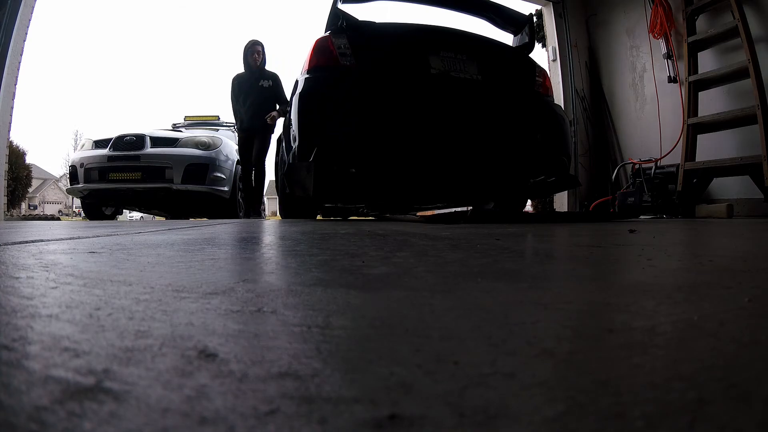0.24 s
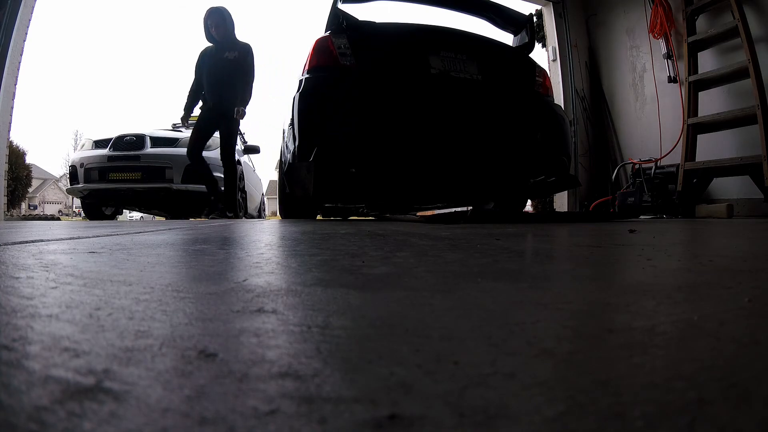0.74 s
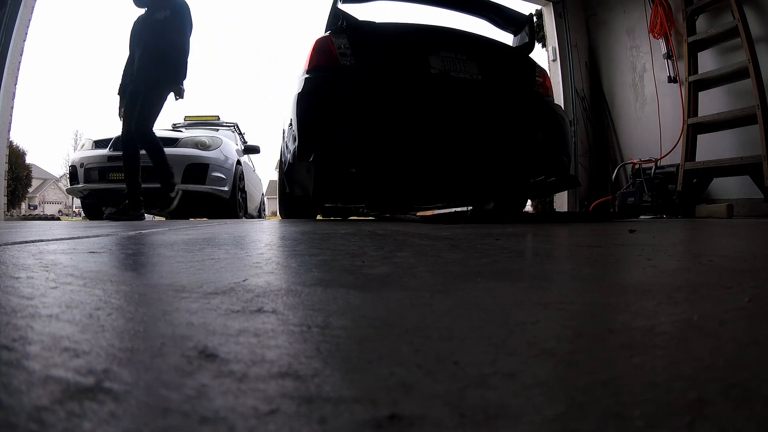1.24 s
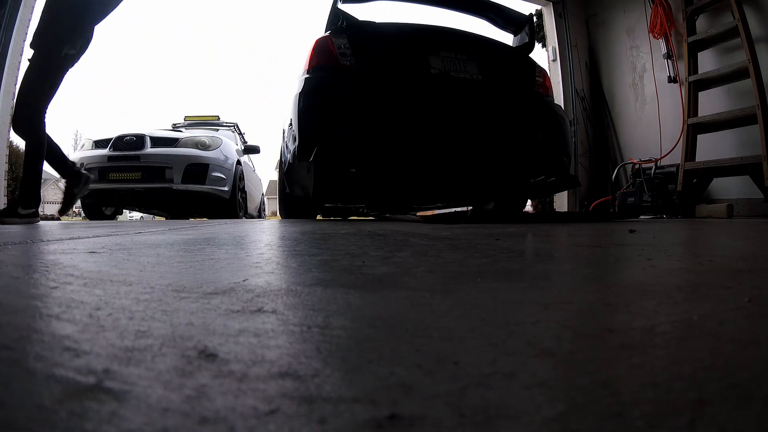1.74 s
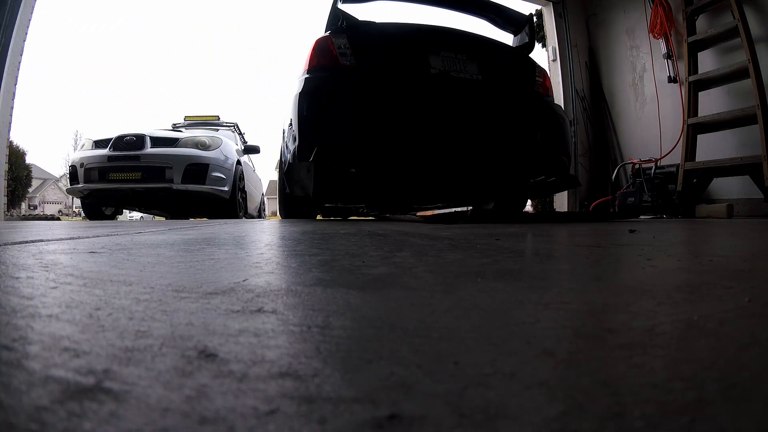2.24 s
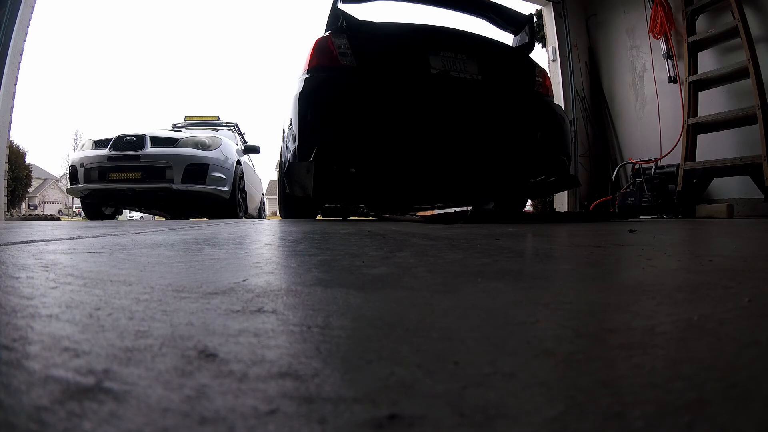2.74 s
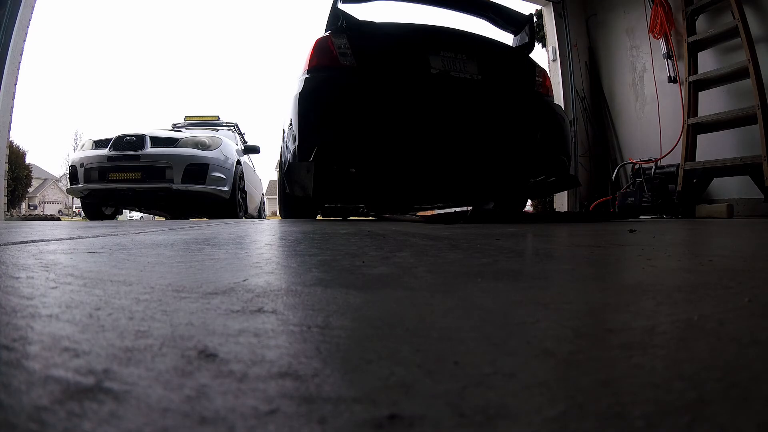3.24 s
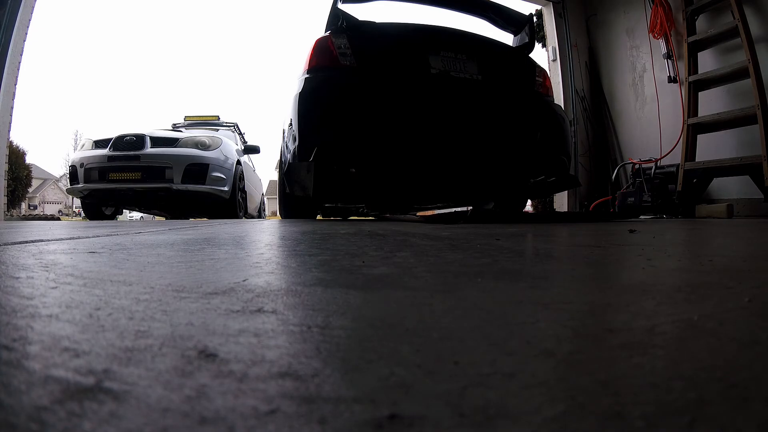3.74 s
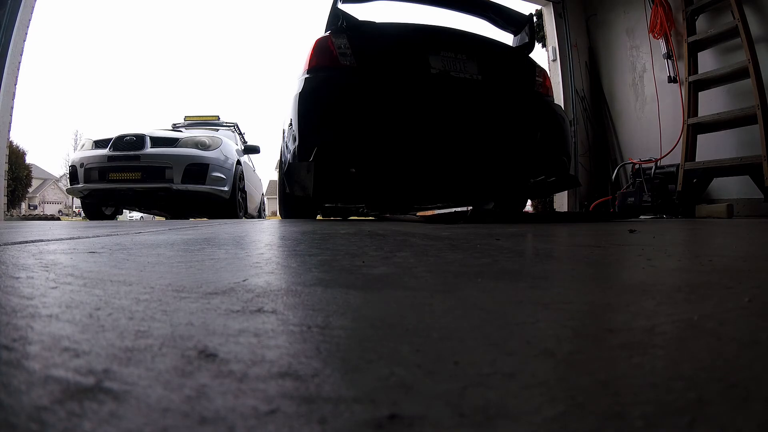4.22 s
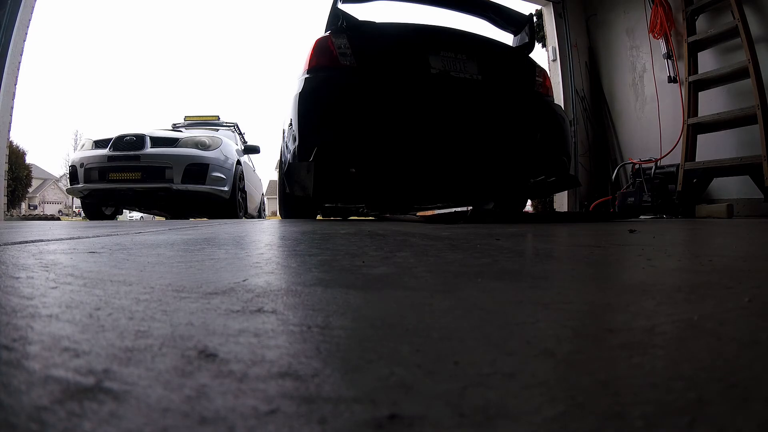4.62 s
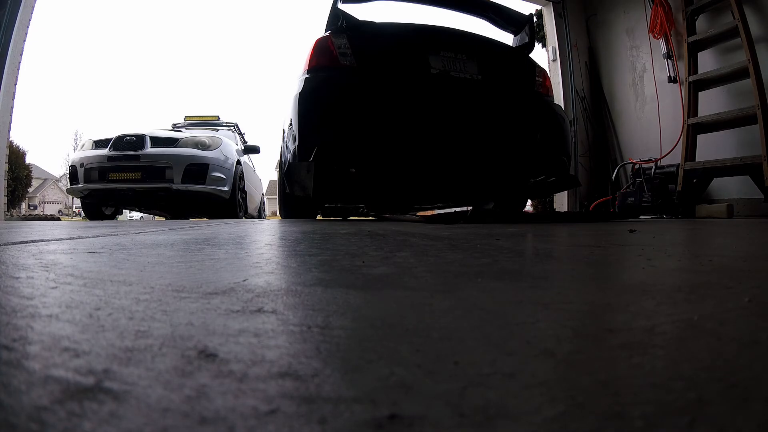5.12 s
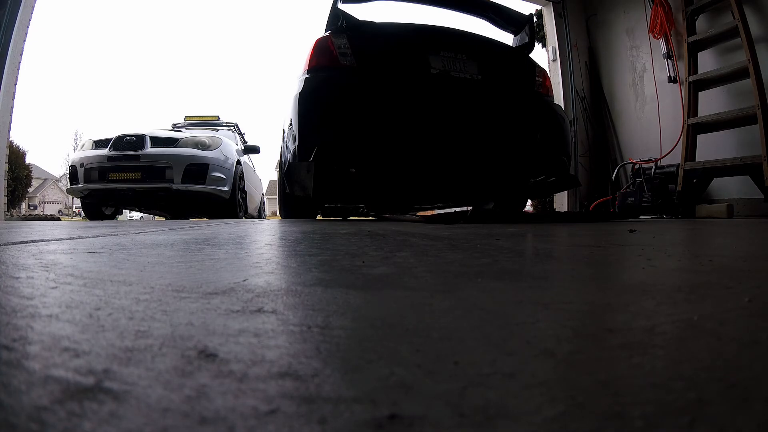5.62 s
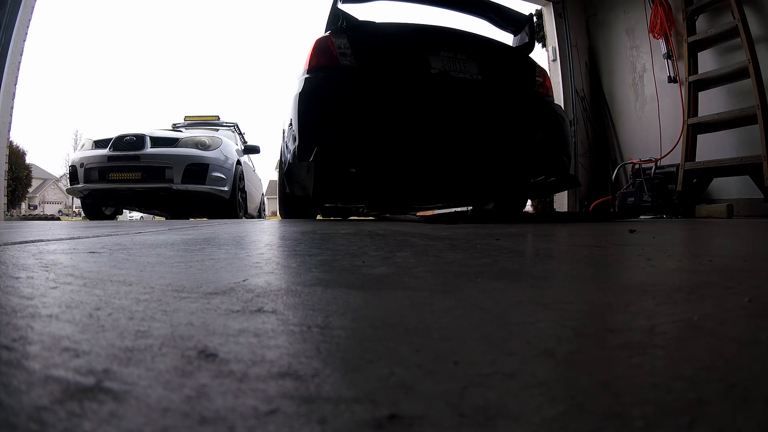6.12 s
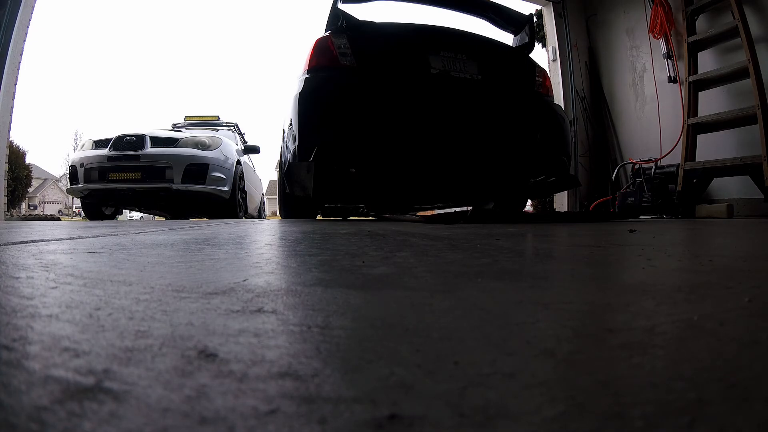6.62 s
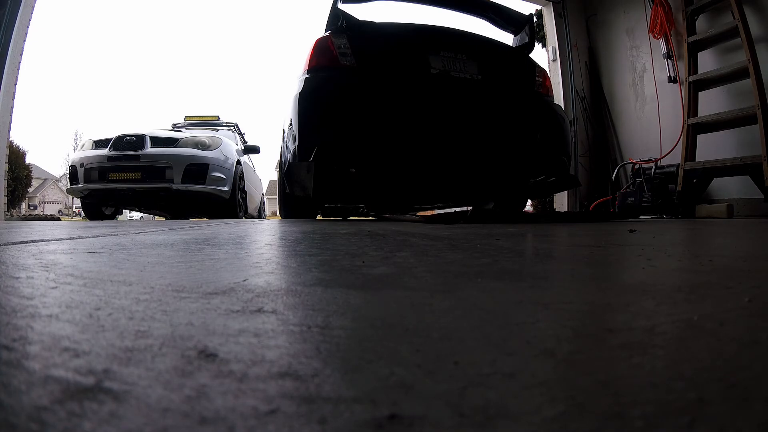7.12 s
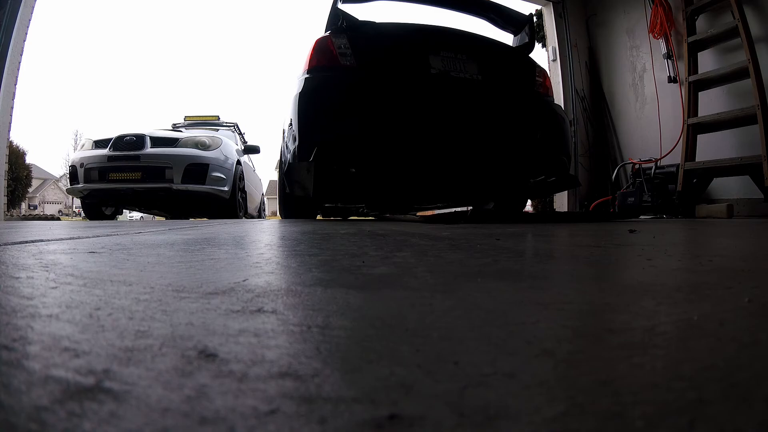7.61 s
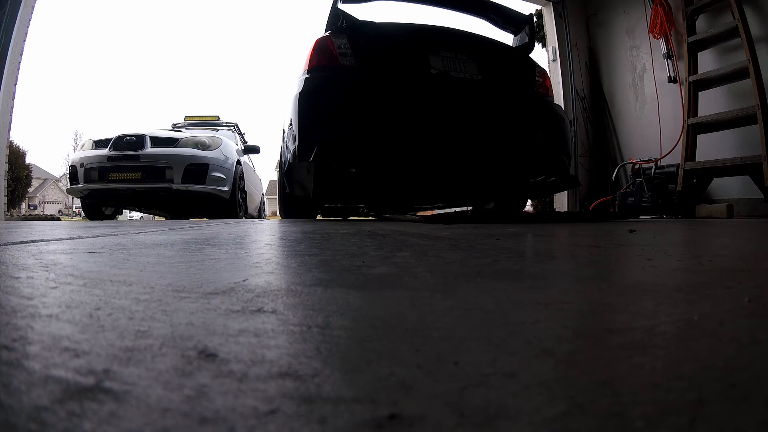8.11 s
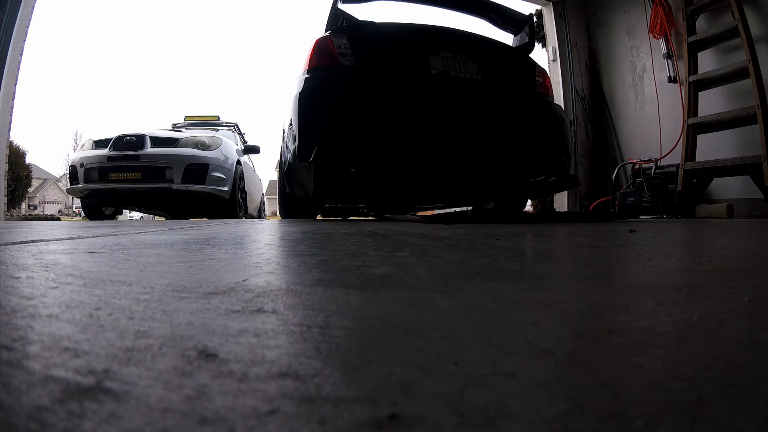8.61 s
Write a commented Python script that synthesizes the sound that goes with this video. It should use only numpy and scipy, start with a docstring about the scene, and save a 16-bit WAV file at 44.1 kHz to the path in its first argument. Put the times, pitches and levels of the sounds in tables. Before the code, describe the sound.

A turbocharged four-cylinder car idles fast and very loud through an open straight exhaust in a garage. The low boom starts slightly lumpy, smooths for about a second, then flares into a barking, uneven lope and settles, creeping up slightly in speed. Raspy gas puffs and faint valve ticking ride along. A small microphone on the floor near the tailpipe hears it close and slightly saturated.

```python
"""A booming, throbbing fast idle: a turbocharged four-cylinder car with an open straight pipe, tail in a garage.
The idle starts half lumpy, runs smooth for a second, flares into a lumpier lope and creeps up in speed.
Unequal pulses, summed as multiples of the engine cycle, make pipe and garage boom once per cycle.
Noise bursts at every firing give lumps and rasping gas; clicks ring the ticking valve gear.
A sine locked to the crank is the faint whine of a belt-driven accessory. A small microphone is on the floor."""
import sys
import numpy as np
from scipy import signal
from scipy.fft import rfft, irfft, next_fast_len
from scipy.io import wavfile

SR = 44100
rng = np.random.default_rng(int(sys.argv[2]) if len(sys.argv) > 2 else 0)


def bounce(signal):
    """Save signal as a 16-bit WAV file at the path given by the first command-line argument."""
    frames = np.transpose(np.atleast_2d(signal))
    limited = np.clip(frames, -1, 1)
    pcm = np.round(limited * 32767).astype(np.int16)
    wavfile.write(sys.argv[1], SR, pcm)


N = 390726
TIME = np.arange(N) / SR

# Crank speed: (time [s], speed [rpm])
CRANK_SPEED = [(0.0, 1517.5), (0.24, 1544.6), (1.05, 1544.6), (1.47, 1555.0), (4.2, 1581.3), (6.55, 1588.3),
               (7.78, 1607.6), (8.86, 1604.7)]
# Exhaust pulse of each cylinder: (place in the two-turn cycle [0-1], level [dB])
CYLINDERS = [(0.053, -2.0), (0.316, -5.1), (0.554, -3.1), (0.817, -6.5)]
# Resonances of pipe and garage, which delay the sound near their pitch: (frequency [Hz], width [Hz])
RESONANCES = [(55.3, 13.5), (108.0, 8.4), (131.8, 9.5), (250.3, 8.0), (313.9, 16.9), (439.3, 35.3),
              (570.8, 31.6), (675, 30), (770, 25), (870, 25), (1025, 30), (1120, 25)]
# What goes with each firing, relative: (gas puff level [dB], valve tick level [dB])
STROKES = [(-2, 2.5), (-1, -1), (-2, -5), (-1.5, 2.5)]
# Colour of the uneven thumps and their echoes: (frequency [Hz], relative level [dB])
LUMP_COLOUR = [(22, -17), (50, -16), (100, -7), (160, -1), (220, -13), (265, -6), (310, -3), (385, -11),
               (435, -2), (560, -11), (700, -18), (1000, -32)]
# Colour of the rasping gas: (frequency [Hz], relative level [dB])
RASP_COLOUR = [(450, -12.5), (690, 6), (820, -9), (865, 4.5), (920, -3.5), (1120, 1.5), (1190, -6),
               (1300, -1), (1520, -2), (1750, -11), (2000, -15), (2400, -22.5), (3200, -34.5), (4500, -39),
               (8000, -50)]
# Colour of the valve gear: (frequency [Hz], relative level [dB])
VALVE_COLOUR = [(2000, -3), (3000, -5.5), (4000, -8), (4500, -5.5), (4750, -1), (5100, -1), (6200, -3),
                (6800, -13), (8300, -17), (10000, -20), (11500, -26.5)]
# Ring of the valve gear before colouring: (frequency [Hz], relative level [dB], t60 [s])
TAPPET_MODES = [(4720, 0, .022), (4840, -3, .016), (6100, -10, .008)]
# Where the bark sits in the exhaust: (frequency [Hz], share of the bark's dB [about 0-1])
BARK_SHARE = [(52, 0.8), (66, 0), (530, 0.03), (573, 1.04), (620, 0.06), (720, .4), (765, 1), (830, 0.01),
              (1000, 0.7), (1150, 0.4)]
# How each sound follows the engine, before fixed trims: (smooth idle [dB], added when settled [dB],
# added in the flare [dB], change as the engine warms [dB/s])
BARK_LAW = (-2, -0.5, 7.5, -0.3)
RASP_LAW = (-44, 2.5, 0.4, .22)
VALVE_LAW = (-59.5, 2.5, 0.4, -0.2265)
# Lean of the drone from the eleventh multiple towards the twelfth, same columns; it grows as the pipe warms
LEAN_LAW = (0, -1.6, 0.33, 0.44)
# Boom of pipe and garage, before bark, lean, swell and wander:
# (multiple of the cycle rate, smooth idle [dB], settled idle [dB])
BOOM = [(3, -38, -40), (4, -29, -39.5), (5, -35.5, -29), (6, -46.5, -41), (7, -29, -29.5), (8, -21, -20),
        (9, -25.5, -27.5), (10, -42.5, -39.5), (11, -15.5, -17.5), (12, -16.5, -14), (13, -28, -34),
        (14, -47, -37.5)]
# Growl above the boom, before lope, resonances and standing waves: (frequency [Hz], level of each multiple [dB])
GROWL = [(200, -32), (265, -28.5), (320, -35), (420, -33), (480, -34), (570, -43), (640, -55), (715, -51),
         (820, -61.5), (1130, -63.5)]
# Unequal firings shape every four multiples alike, counted from a multiple of the firing rate,
# fading with frequency: (smooth idle [dB], settled idle [dB])
LOPE = [(5.5, -1.5), (-5.5, -7.5), (-13, -12), (1, 1)]
# Multiples that standing waves lift or cancel: (multiple, added in smooth idle [dB], added in settled idle [dB])
STANDING_WAVES = [(21, -15, -6), (22, -4, -5), (23, -5.5, 4), (24, 4, -5), (25, -8, 15), (30, 12, -9.5),
                  (33, 11, 1.1), (41, 8.5, -8)]
# Hollow-tone swells, at the start and as the flare dies away: (start [s], length [s])
SWELLS = [(-.15, .62), (2.45, 0.93)]

# The idle starts partly lumpy (share 0-1), turns smooth, then settles into its lope
FIRST_LUMPY, SMOOTH_AT_S, SETTLE_AT_S, CHANGE_S = 0.57, 0.3, 1.35, 0.15
FLARE_HOLD_S, FLARE_RELEASE_S = 0.83, 0.4
TOP_MULTIPLE = 86
LOPE_FADES_HZ = 450
# Above this frequency the resonances lift the multiples near them
RING_FROM_HZ, RING_DB = 550, 7.5
SWELL_HZ, SWELL_WIDTH_HZ, SWELL_DB = 458.5, 8.3, 8
CUTOFF_HZ = 11200


def from_db(db):
    """Decibels to gain."""
    return 10 ** (np.asarray(db) / 20)


def rms_one(x):
    """Scale to unit rms."""
    return x / np.sqrt(np.mean(x ** 2) + 1e-20)


def in_time(rows):
    """Each column of a curve at every sample."""
    seconds, *columns = np.transpose(rows)
    return [np.interp(TIME, seconds, column) for column in columns]


def drift(rate, t):
    """Random wander: straight lines between normal draws of spread 1, rate of them a second."""
    knots = rng.standard_normal(512)
    return np.interp(t * rate, np.arange(len(knots)), knots)


def ramp(start_s, length_s):
    """A straight rise from 0 to 1."""
    return np.clip((TIME - start_s) / length_s, 0, 1)


def coloured(x, spectrum):
    """Pass x through a causal (minimum-phase) filter of the given colour with steep ends; rms 1."""
    size = next_fast_len(N + SR // 2, True) // 2 * 2
    hz, db = np.transpose(spectrum)
    octave = np.log2(np.maximum(np.arange(size // 2 + 1) * SR / size, 1))
    below = np.maximum(np.log2(hz[0]) - octave, 0)
    above = np.maximum(octave - np.log2(hz[-1]), 0)
    # 24 dB per octave outside the table, for three octaves
    gain_db = np.interp(octave, np.log2(hz), db) - 24 * np.minimum(below + above, 3)
    # folding the cepstrum onto positive times makes the filter minimum-phase
    cepstrum = irfft(np.log(from_db(gain_db)))[:size // 2]
    cepstrum[1:] *= 2
    response = np.exp(rfft(cepstrum, size))
    return rms_one(irfft(rfft(x, size) * response)[:N])


def firings(cycles, lag):
    """Sample and cylinder of every firing, taken lag cycles after its pulse."""
    whole_cycles = np.arange(int(cycles[-1]) + 1)[:, None]
    places = (whole_cycles + np.array(CYLINDERS)[:, 0] + lag).ravel()
    at = np.searchsorted(cycles, places[places < cycles[-1]])
    return at, np.arange(len(at)) % len(CYLINDERS)


def clicks(at, heights):
    """Single clicks at the given samples."""
    out = np.zeros(N)
    out[at] = heights
    return out


def bursts(at, db, rise_s, decay_s):
    """An envelope that rises quickly at each click and dies away; rms 1."""
    out = clicks(at, from_db(db)) + 1e-18
    for seconds in (rise_s, decay_s):
        out = signal.lfilter([1], [1, -np.exp(-1 / (seconds * SR))], out)
    return rms_one(out)


def ring(x, hz, t60):
    """A two-pole resonator: a unit click sets a decaying sine of about height 1 ringing."""
    radius = from_db(-60 / (t60 * SR))
    angle = 2 * np.pi * hz / SR
    return signal.lfilter([0, np.sin(angle)], [1, -2 * radius * np.cos(angle), radius ** 2], x + 1e-18)


def idle_state():
    """How settled (lumpy) the idle is and how much it flares, each 0-1."""
    lope = ramp(SETTLE_AT_S, CHANGE_S)
    settled = FIRST_LUMPY * (1 - ramp(SMOOTH_AT_S, CHANGE_S)) + lope
    flare = lope * (1 - ramp(SETTLE_AT_S + CHANGE_S + FLARE_HOLD_S, FLARE_RELEASE_S))
    return settled, flare


def follow(law, settled, flare):
    """Level in dB of a sound that follows the state and warmth of the engine."""
    smooth_db, settled_db, flare_db, db_per_s = law
    return smooth_db + settled_db * settled + flare_db * flare + db_per_s * TIME


def swelling():
    """Strength 0-1 of the hollow tone, a smooth arch for each swell."""
    return sum(np.sin(np.pi * ramp(start_s, length_s)) for start_s, length_s in SWELLS)


def multiples(cycle_hz):
    """Rows (multiple, smooth dB, settled dB): the boom, then growl shaped by lope, resonances, standing waves."""
    rows = [(round(order), *db) for order, *db in BOOM]
    standing = {round(order): np.array(db) for order, *db in STANDING_WAVES}
    growl_hz, growl_db = np.transpose(GROWL)
    centre, width = np.transpose(RESONANCES)
    for order in range(len(BOOM) + rows[0][0], TOP_MULTIPLE + 1):
        hz = order * cycle_hz
        base_db = np.interp(np.log(hz), np.log(growl_hz), growl_db)
        lope_db = np.array(LOPE[order % len(LOPE)]) * min(1, (LOPE_FADES_HZ / hz) ** 2)
        nearness = (centre > RING_FROM_HZ) / (1 + (2 * (hz - centre) / width) ** 2)
        db = base_db + RING_DB * np.max(nearness) + lope_db + standing.get(order, 0)
        rows.append((order, *db))
    return rows


def exhaust_note(cycles, cycle_hz, settled, bark_db, lean_db):
    """The repeating part of the exhaust: four pulses a cycle, smeared by the resonances."""
    step = 9  # built at a ninth of the sample rate
    drone = {11: -1, 12: 1}
    wander_db, wander_rad, wander_rate = 0.9, 0.11, 1.4  # rate per second; scaled by looseness
    controls = (TIME, cycles, np.clip(settled, 0, 1), bark_db, lean_db, swelling())
    t, turn, mix, bark, lean, swell = (control[::step] for control in controls)
    place, pulse_db = np.transpose(CYLINDERS)
    centre, width = np.transpose(RESONANCES)
    out = 0
    for order, smooth_db, settled_db in multiples(cycle_hz):
        hz = order * cycle_hz
        pulses = np.sum(from_db(pulse_db) * np.exp(-2j * np.pi * order * place))
        delay = 2 * np.sum(np.arctan2(hz * width, centre ** 2 - hz ** 2))  # phase lag
        # short waves are the most upset by the changing gas flow
        loose = min(hz / 220, 3) * (1 + mix) / 2
        gain = np.sqrt((1 - mix) * from_db(smooth_db) ** 2 + mix * from_db(settled_db) ** 2)
        db = bark * np.interp(hz, *np.transpose(BARK_SHARE)) + lean * drone.get(order, 0)
        db = db + SWELL_DB * swell * np.exp(-((hz - SWELL_HZ) / SWELL_WIDTH_HZ) ** 2)
        gain = gain * from_db(db + wander_db * loose * drift(wander_rate, t))
        angle = 2 * np.pi * order * turn + np.angle(pulses) - delay
        angle = angle + wander_rad * loose * drift(wander_rate, t)
        out = out - np.sqrt(2) * gain * np.cos(angle)
    return signal.resample_poly(out, step, 1, window=("kaiser", 10))[:N]


def lumps(cycles, settled):
    """No two burns are alike: each firing adds a thump of random size, with echoes off the walls."""
    smooth_db, settled_db = -28.7, 4  # level in smooth idle, and what settling adds
    at, _ = firings(cycles, lag=0.03)
    thumps = rms_one(clicks(at, rng.uniform(-1, 1, len(at))))
    echo_envelope = bursts(at, rng.normal(0, 2.3, len(at)), rise_s=0.00047, decay_s=0.064)
    echoes = rms_one(rng.standard_normal(N) * echo_envelope)
    return from_db(smooth_db + settled_db * settled) * coloured(thumps + echoes, LUMP_COLOUR)


def rasp(cycles, settled, rasp_db):
    """Each pulse front cracks and rings round the garage alike, and a fresh puff of turbulent gas follows it."""
    jet, front_db = 1.2, -10  # steady gas beside puffs of rms 1; crack of the fronts
    ring_t60, ring_db, spread_db, trim_db = 0.32, 1.5, 4.5, 3.0
    at, cylinder = firings(cycles, lag=0.07)
    db = np.array(STROKES)[cylinder, 0] + spread_db * rng.uniform(-1, 1, len(at))
    fronts = rms_one(clicks(at, from_db(db)))
    tail = TIME[:SR // 3]
    garage = rng.standard_normal(len(tail)) * from_db(-60 * tail / ring_t60)
    ringing = rms_one(signal.fftconvolve(fronts, garage)[:N])
    # the ringing drops 1 dB as the idle settles
    knocks = from_db(front_db) * fronts + from_db(ring_db - settled) * ringing
    knocks = signal.sosfilt(signal.butter(2, 1700, fs=SR, output="sos"), knocks)
    gas_flow = bursts(at, db, rise_s=0.00051, decay_s=0.0074) + jet
    puffs = rms_one(rng.standard_normal(N) * gas_flow)
    return from_db(rasp_db + trim_db) * coloured(knocks + puffs, RASP_COLOUR)


def valves(cycles, valve_db):
    """One ringing tick and a short rustle per stroke, over the steady hiss of the running engine."""
    tick_db, rustle_db = -7, 2.5  # added to valve_db
    hiss_db, spread_db, mode_spread_db = 9, 4.0, 4.3  # hiss relative to the rustle's envelope
    at, cylinder = firings(cycles, lag=0.13)
    db = np.array(STROKES)[cylinder, 1] + spread_db * rng.uniform(-1, 1, len(at))
    ticks = np.zeros(N)
    for hz, mode_db, t60 in TAPPET_MODES:
        strike_db = db + mode_db + rng.normal(0, mode_spread_db, len(at))
        ticks += ring(clicks(at, from_db(strike_db)), hz, t60)
    envelope = bursts(at, db, rise_s=0.00076, decay_s=0.0068) + from_db(hiss_db)
    rustle = from_db(rustle_db) * coloured(rng.standard_normal(N) * envelope, VALVE_COLOUR)
    return from_db(valve_db) * (rustle + from_db(tick_db) * coloured(ticks, VALVE_COLOUR))


def whine(cycles, settled):
    """A thin accessory tone locked to the crank, fading as the idle settles."""
    per_cycle = 171.7  # sine periods per engine cycle
    smooth_db, settled_db, waver_db = -67, -12, 1.5
    gain = from_db(smooth_db + settled_db * settled + waver_db * drift(15, TIME))
    return gain * np.sqrt(2) * np.sin(2 * np.pi * per_cycle * cycles)


def scene():
    """The crank drives every layer."""
    rpm, = in_time(CRANK_SPEED)
    cycle_hz = rpm / 120  # two turns a cycle
    cycles = np.cumsum(cycle_hz) / SR
    settled, flare = idle_state()
    bark_db = follow(BARK_LAW, settled, flare)
    lean_db = follow(LEAN_LAW, settled, flare)
    rasp_db = follow(RASP_LAW, settled, flare)
    valve_db = follow(VALVE_LAW, settled, flare)
    note = exhaust_note(cycles, np.median(cycle_hz), settled, bark_db, lean_db)
    exhaust = note + lumps(cycles, settled) + rasp(cycles, settled, rasp_db)
    engine = valves(cycles, valve_db) + whine(cycles, settled)
    return (exhaust + engine)[None]


def record(dry, top=1.02):
    """A small microphone on the floor rounds the loudest peaks a little and cuts the top."""
    rounded = top * np.tanh(dry / top)
    return signal.sosfilt(signal.butter(12, CUTOFF_HZ, fs=SR, output="sos"), rounded)


dry = scene()
out = record(dry)
bounce(out)
```